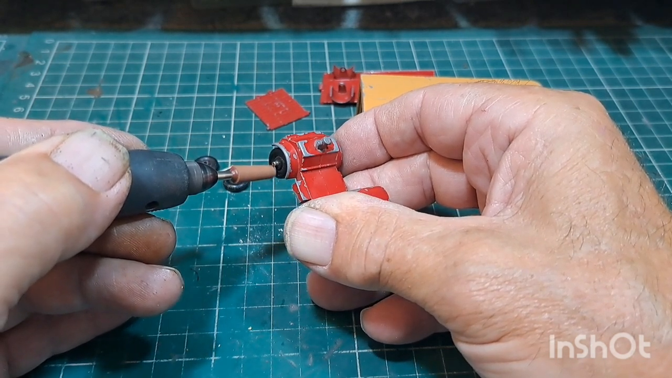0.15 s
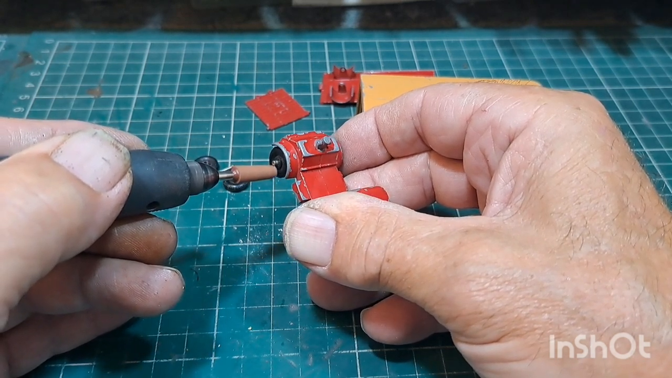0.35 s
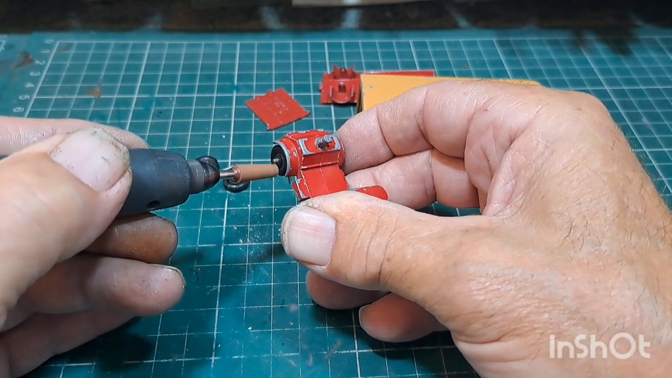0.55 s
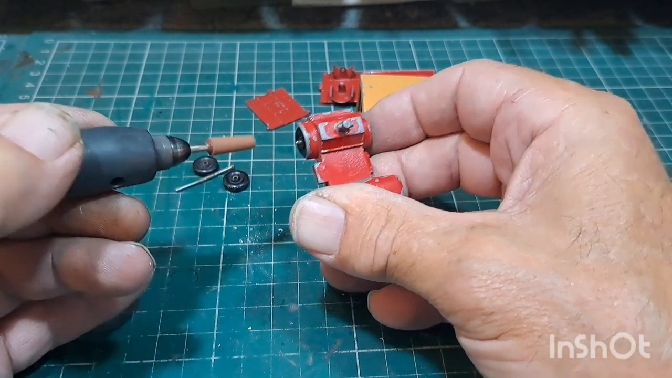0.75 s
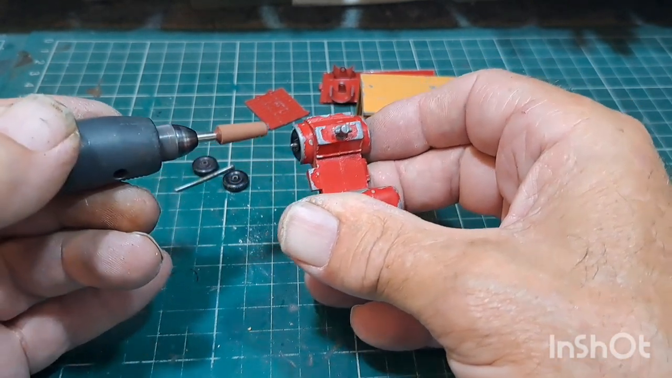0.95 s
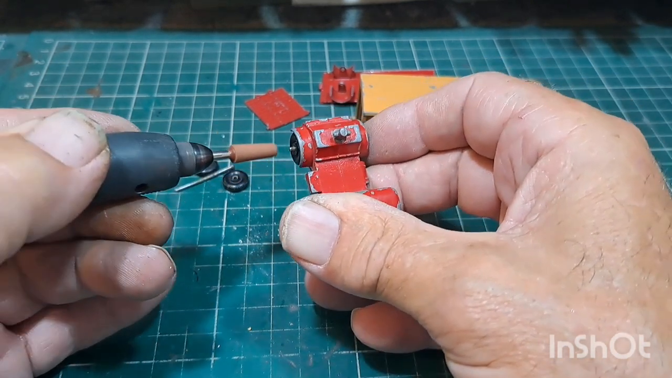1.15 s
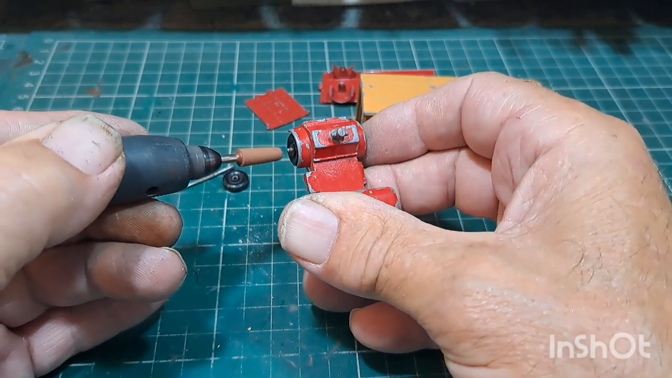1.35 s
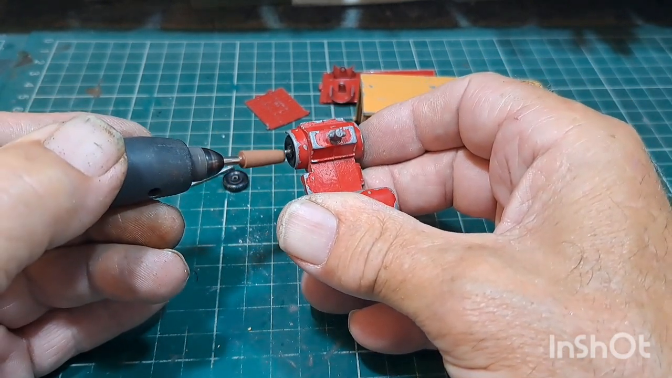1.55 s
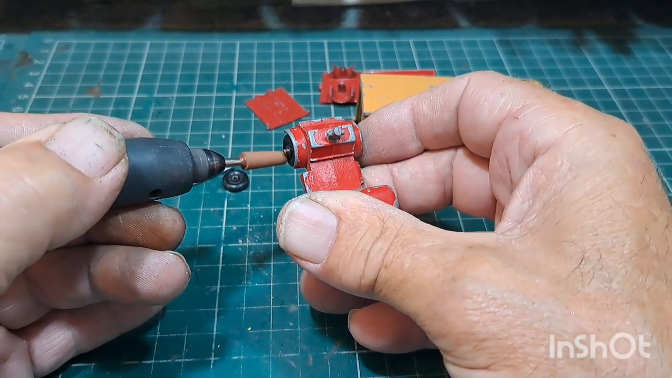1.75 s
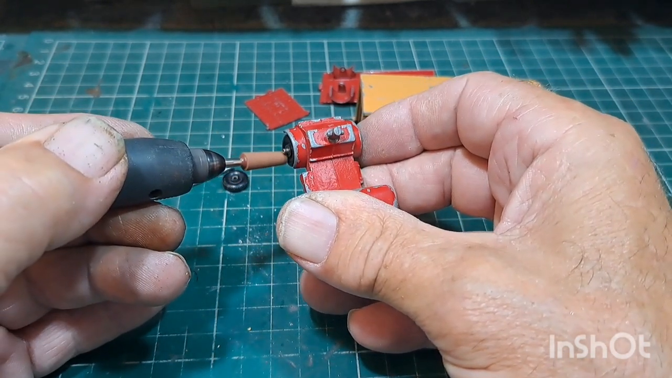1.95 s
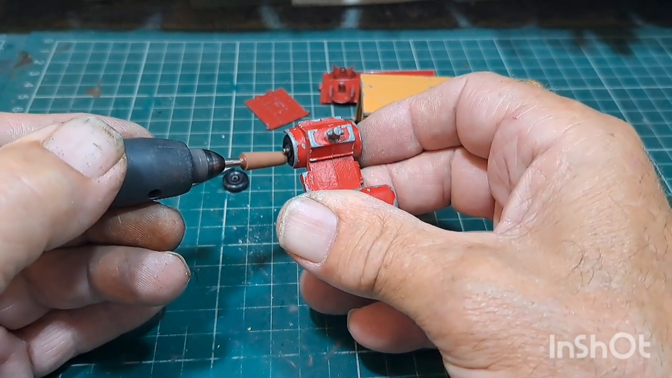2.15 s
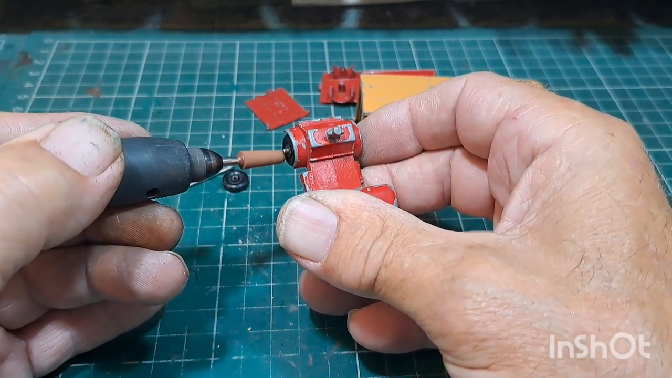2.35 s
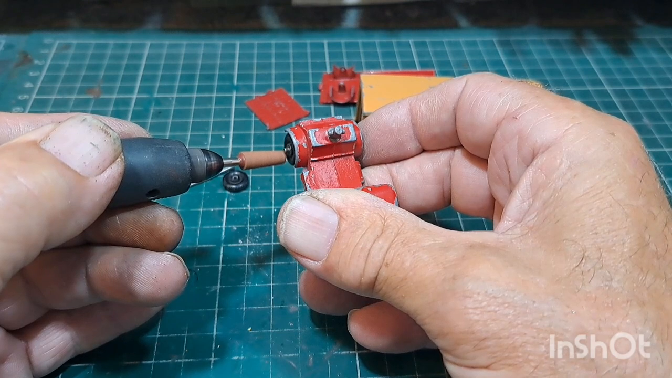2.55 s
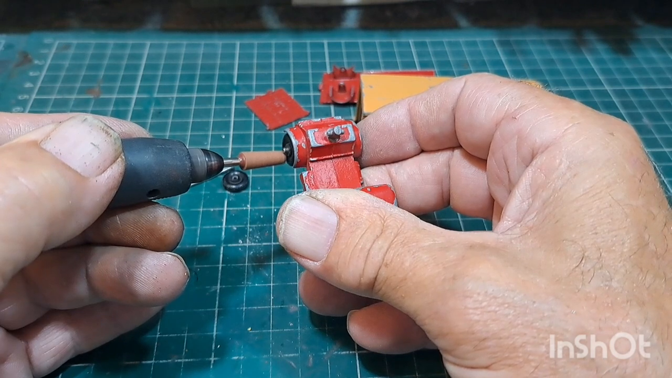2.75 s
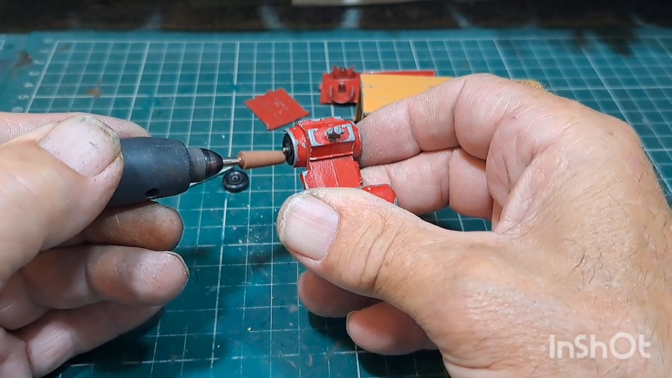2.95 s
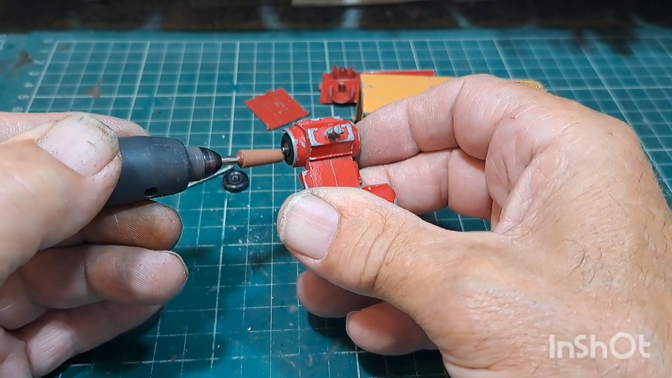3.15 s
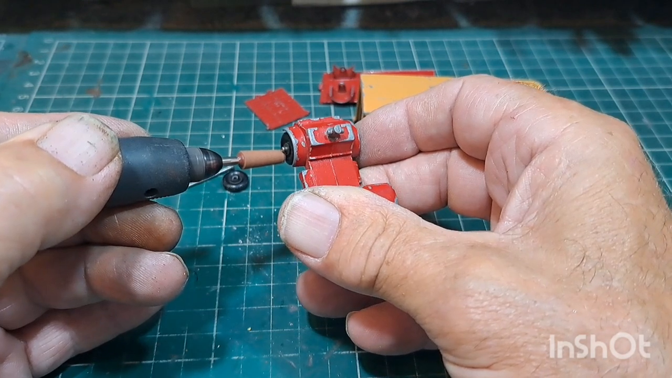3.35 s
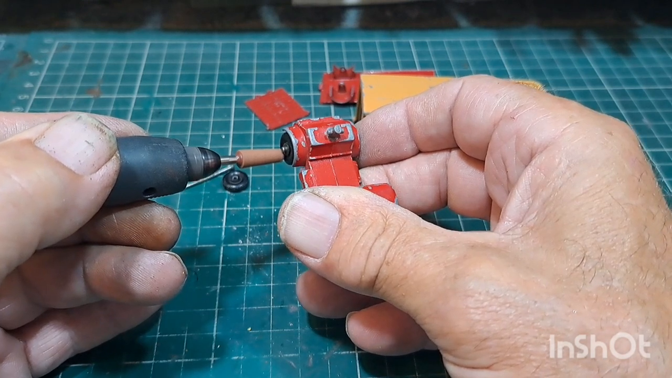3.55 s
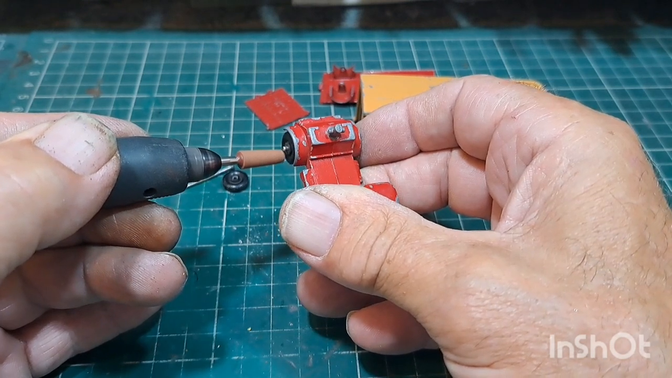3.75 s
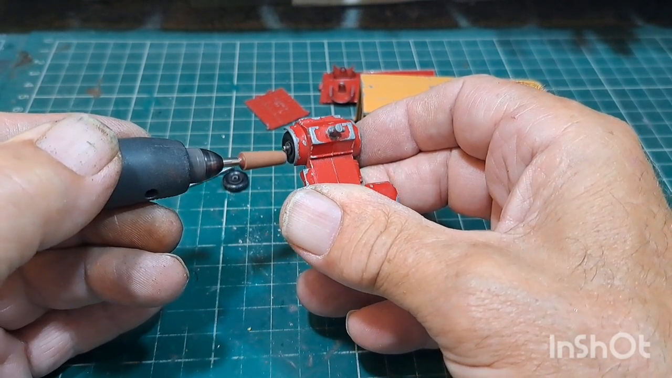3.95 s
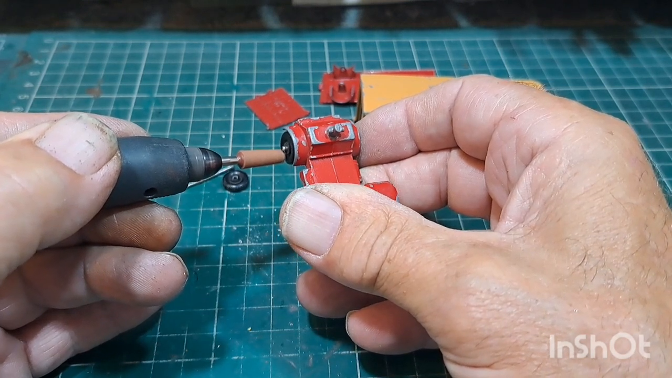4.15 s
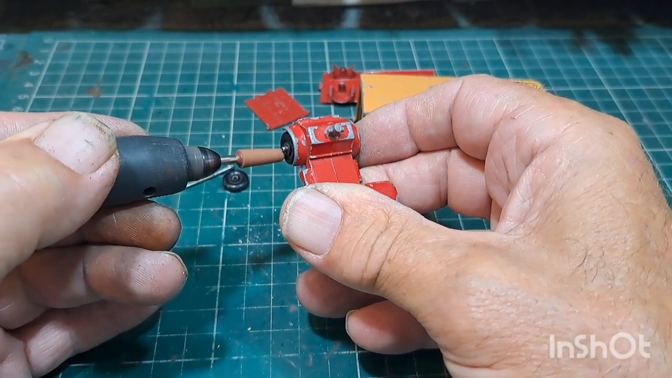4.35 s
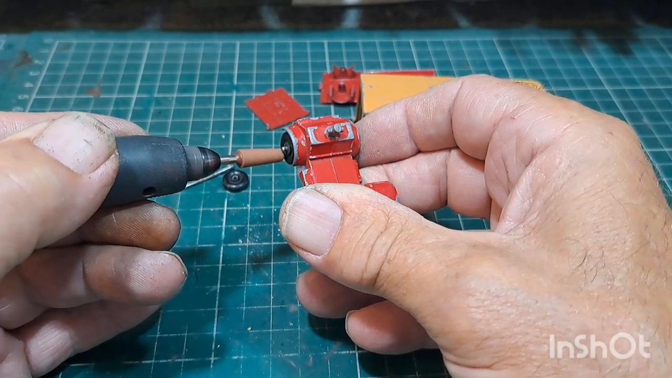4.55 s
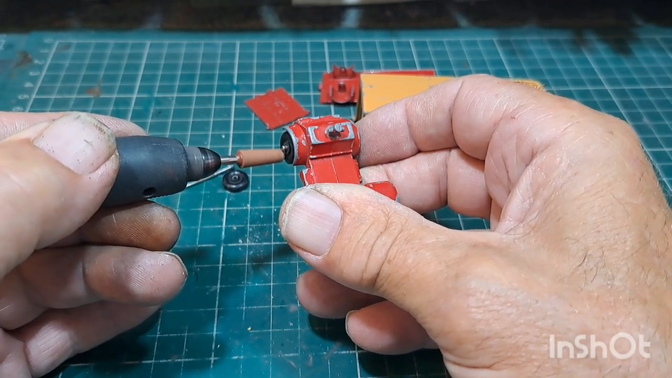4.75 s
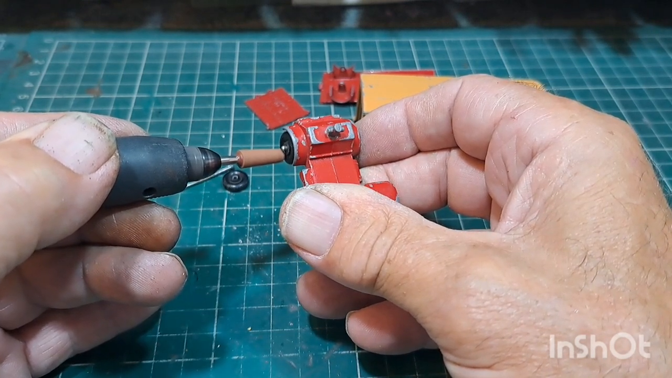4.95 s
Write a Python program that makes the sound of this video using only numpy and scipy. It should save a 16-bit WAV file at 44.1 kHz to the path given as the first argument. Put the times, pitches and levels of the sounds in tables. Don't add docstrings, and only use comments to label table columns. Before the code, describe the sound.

A small rotary tool works very close to a stereo phone microphone in a quiet room. From 0 to 0.6 s its stone grinds the metal axle of a hand-held toy car: a harsh, gritty buzz fluttering about 180 times a second, with bright metallic ringing and hissy treble. It lifts off, and until about 1.6 s only the far quieter motor remains: low steady hum, thin bearing whine, dry brush rattle, a soft knock near 0.9 s and small ticks, clearest near 1.1 s. The stone touches again at 1.6 s, breaks off briefly around 1.8 s, then presses harder through 2 to 3.9 s, with sharp irregular bites and slight changes in strength. Around 4 to 4.2 s it eases and skips in short gaps, then grinds firmly to the end, with an especially hard catch near 4.7 s. Faint room noise and a distant low drone lie underneath; reflections are short.

```python
import sys
import numpy as np
from scipy import signal
from scipy.fft import rfft, irfft, next_fast_len
from scipy.io import wavfile
from scipy.ndimage import uniform_filter1d

SR = 44100
rng = np.random.default_rng(int(sys.argv[2]) if len(sys.argv) > 2 else 0)


def gain_from_db(level_db):
    decades = np.asarray(level_db, float) / 20
    return 10 ** decades


def wav_record(signal):
    frames = np.transpose(np.atleast_2d(signal))
    bounded = np.clip(frames, -1, 1)
    quanta = np.round(bounded * 32767).astype(np.int16)
    wavfile.write(sys.argv[1], SR, quanta)


N = 220617
T = np.arange(N) / SR
M = 2 * next_fast_len(N // 2 + 1)
HZ = np.fft.rfftfreq(M, 1 / SR)
PORT_LAG = 14
SINE = np.sqrt(2)

# time in seconds, speed in turns per second.
SHAFT = [(0, 182.4), (.5, 182.96), (1, 183.22), (1.5, 183.4), (2, 183.01), (2.4, 182.45), (2.8, 182.8),
         (3.25, 182.39), (3.7, 181.09), (4.05, 182.58), (4.35, 181.99), (4.6, 181.52), (5, 181.19)]


def curve(table, at=T):
    s, *columns = np.transpose(table)
    return [np.interp(at, s, c) for c in columns]


def unit(x):
    return x / np.sqrt(np.mean(x ** 2))


def walk(rate_hz):
    k = int(SR / rate_hz)
    held = np.repeat(rng.standard_normal(N // k + 1), k)
    return 1.85 * uniform_filter1d(uniform_filter1d(held, k), k)[:N]


def swells(table, floor_db):
    return gain_from_db(floor_db) + sum(gain_from_db(db) * np.exp(-((T - s) / half_s) ** 2) for s, half_s, db in table)


def panned(x, left_minus_right_db):
    half_db = np.ones(N) * left_minus_right_db / 2
    return x * gain_from_db(np.array([half_db, -half_db]))


def ports(shared, grain_db=0., lag=PORT_LAG):
    grain = gain_from_db(grain_db * np.minimum(rng.exponential(size=N), 4.5))
    common, left, right = rng.standard_normal((3, N)) * grain
    together = np.array([common, np.roll(common, lag)])
    return unit(np.sqrt(shared) * together + np.sqrt(1 - shared) * np.array([left, right]))


def body(modes):
    hz, width_hz, *port_db = np.array(modes, float).T[..., None]
    peak = 1 / (1 + ((HZ ** 2 - hz ** 2) / (HZ * width_hz + 1e-9)) ** 2) ** 1.419
    power = np.array([np.sum(gain_from_db(2 * db) * peak, axis=0) for db in port_db]) + 1e-12
    cepstrum = irfft(np.log(power / power.mean()) / 2, M)
    cepstrum[:, 1:M // 2] *= 2
    cepstrum[:, M // 2 + 1:] = 0
    return np.exp(rfft(cepstrum))


def ring(x, modes):
    return irfft(rfft(x, M) * body(modes))[:, :N]


def bursts(times_s, db, rise_s, fall_s):
    spikes = np.bincount(np.clip((times_s * SR).astype(int), 0, N - 1), gain_from_db(db), N)
    t = T[:SR // 20]
    shape = (1 - np.exp(-(t / rise_s) ** 2)) * np.exp(-t / fall_s)
    return signal.fftconvolve(spikes, shape / np.sqrt(np.sum(shape ** 2) * SHAFT[0][1] / SR))[:N]


def room():
    # frequency in Hz, density in dB.
    noise_colour = [(20, -14.5), (35, -19), (60, -3), (130, -3.5), (230, -5.5), (320, -5), (620, -7.5),
                    (1500, -31), (16000, -54.5)]
    # middle in seconds, half length in seconds, level in dB.
    drone = [
        (1.06, .17, -61),
        (2.07, 0.11, -58),
    ]
    # start in seconds, frequency in Hz, 60 dB decay in seconds, level in dB.
    knocks = [
        (.917, 380, .04, -37),
        (.917, 690, .05, -39),
        (3.778, 440, .04, -32),
    ]
    colour_hz, colour_db = np.transpose(noise_colour)
    colour = gain_from_db(np.interp(np.log(HZ + 1), np.log(colour_hz), colour_db))
    hiss = unit(irfft(rfft(ports(0.46), M) * colour)[:, :N])
    air = gain_from_db(-57 + 1.9 * walk(2.05)) * hiss
    low = gain_from_db(-61 + 1.5 * walk(5)) * SINE * np.sin(2 * np.pi * 99.96 * T + .5 * walk(7))
    low = low + swells(drone, -69.5) * SINE * np.sin(2 * np.pi * 57 * T + 0.55 * walk(4.1))
    for s, hz, t60_s, db in knocks:
        t = np.maximum(T - s, 0)
        low = low + gain_from_db(db) * np.sin(2 * np.pi * hz * t) * (1 - np.exp(-t / 0.003)) * 1000. ** (-t / t60_s)
    return air + panned(low, -2.1)


def shaft_hum(turns, hum_db):
    # middle in seconds, half length in seconds, level in dB.
    tilts = [(.57, .06, -60), (.95, 0.16, -61), (1.55, .2, -59.5), (2.35, 0.15, -60.5), (2.6, 0.15, -66),
             (3.06, 0.09, -62), (3.57, 0.15, -54), (3.79, .04, -57), (4.35, 0.13, -64), (4.8, 0.42, -57.5)]
    loose_db = hum_db.max() - hum_db
    pan_db = -5 + .5 * np.minimum(2 - loose_db, 0)
    once = gain_from_db(hum_db + 0.18 * loose_db * walk(9.6)) * SINE * np.sin(2 * np.pi * turns)
    twice = swells(tilts, -69) * SINE * np.sin(4 * np.pi * turns + 1.2 * walk(20))
    return panned(once, pan_db) + panned(twice, -6.0)


def bearing_whine(turns, hum_db):
    # multiple of shaft rate, level in dB, left minus right in dB.
    tones = [(2.17, -71, -2), (2.69, -71, 0), (3, -73, 0), (4.612, -60, 2), (5, -65, 0), (5.612, -58, -3),
             (6, -65, -3), (6.612, -59, -4), (9.224, -65, -4), (10.224, -54, -5), (11.224, -58, -4),
             (11.82, -62, -3), (15.83, -66, -2), (17.83, -68, 0)]
    out = 0
    for order, db, side_db in tones:
        level = gain_from_db(db + .7 * (hum_db + 46) + 2.2 * walk(16))
        tone = SINE * np.sin(2 * np.pi * order * turns + .6 * walk(10) + order)
        out = out + panned(level * tone, side_db)
    return out


def brush_rattle(turns):
    # frequency in Hz, width in Hz, left port in dB, right port in dB.
    housing = [(973, 300, -7.5, -10), (1577, 650, 0, 3.5), (2074, 510, 0.5, 2.5), (3100, 810, -4.5, -3.5),
               (4100, 970, -9, -1.5), (4820, 490, 2.5, -2.5), (5600, 730, -2, -4.5),
               (7920, 1900, -10.5, -5.5), (9500, 3300, -13, -31.5), (11940, 1630, -3.5, 0.5),
               (13800, 2450, -13.5, -18), (15300, 4300, -10, -8)]
    # time in seconds, level over the rattle in dB.
    ticks = [
        (.73, -8),
        (.82, -11),
        (1.01, -2),
        (1.084, 7),
        (1.215, -3),
        (1.322, 1),
    ]
    timing, strength = rng.standard_normal((2, int(turns[-1])))
    times_s = np.interp(np.arange(len(timing)) - .25 + 0.16 * timing, turns, T)
    play = 1.43 + bursts(times_s, -8 + 3.3 * np.minimum(strength, 1.6), 0.00061, 0.0016)
    play = play + bursts(*np.transpose(ticks), .001, 0.0044)
    return gain_from_db(-41) * ring(play * ports(0.3, grain_db=4.0), housing)


def motor(turns):
    # time in seconds, shaft hum level in dB.
    grip = [(0.0, -46), (0.08, -47), (1.21, -47), (2.28, -44), (2.42, -48), (3.01, -46), (3.66, -51.5),
            (3.72, -57), (3.88, -54.5), (4.82, -51.5), (4.86, -47), (4.9, -58), (5.0, -50)]
    hum_db = curve(grip)[0]
    return shaft_hum(turns, hum_db) + bearing_whine(turns, hum_db) + brush_rattle(turns)


def stone_bites(turns, press_db, touching, bounce_db):
    # time in seconds, place in turns.
    high_spot = [(0, -.3), (2.75, -.25), (3.5, -.06), (5, -.09)]
    # time in seconds, peak in dB.
    hard_bites = [(0.1246, -5.5), (0.3433, -8.5), (0.381, -10), (0.4689, -4), (0.5239, -6.5), (1.5886, -11),
                  (1.8464, -12.5), (1.9158, -9.5), (1.9484, -12), (1.9925, -7.5), (2.1731, -5),
                  (2.1837, -5), (2.43, -6), (2.496, -7.5), (2.5676, -5), (2.6209, -9.5), (2.6439, -9),
                  (2.6985, -4), (2.7975, -1.5), (2.89, -8), (3.705, -5.5), (3.8686, -8.5), (3.9845, -9.5),
                  (4.0112, -12.5), (4.0613, -12), (4.1277, -4.5), (4.1712, -12.5), (4.1929, -11.5),
                  (4.7147, -4), (4.7593, -5)]
    count = np.arange(1, int(turns[-1]))
    times_s = np.interp(count, turns - curve(high_spot)[0], T)
    timing, strength = rng.standard_normal((2, len(count)))
    hard_s, peak_db = np.transpose(hard_bites)
    hard = np.abs(times_s[:, None] - hard_s + .0005).argmin(axis=0)
    since_hard = count - np.maximum.accumulate(np.isin(count - 1, hard) * count)
    times_s = times_s + .00025 * timing
    times_s[hard] = hard_s - .0008
    at = (times_s * SR).astype(int).clip(0, N - 1)
    uneven = np.minimum(strength - 0.42 * np.roll(strength, shift=1), 1.4)
    alternate = (-1.) ** since_hard - .4
    bite_db = press_db[at] - 6 + 3.72 * uneven + bounce_db[at] * alternate
    bite_db[~touching[at]] = -120
    bite_db[hard - 1] += -7
    bite_db[hard] = peak_db - 19.5
    crack = bursts(hard_s, bite_db[hard] - 10, 0.00034, 0.00048)
    return times_s, at, bite_db, crack


def grinding(turns):
    # time in seconds, pressure as scrape level in dB.
    contact_spans = [
        [(0.0, -32.5), (0.04, -27.5), (0.46, -26.5), (0.47, -35), (0.476, -25), (0.57, -26.5), (0.6, -32),
         (0.63, -58)],
        [(1.586, -32.5), (1.656, -22.5), (1.758, -26), (1.78, -33), (1.79, -50), (1.8, -38)],
        [(1.8, -41), (1.856, -32.5), (1.864, -44.5), (1.92, -24), (1.926, -32.5), (2.094, -21.5), (2.1, -27.5),
         (2.436, -21), (2.45, -32)],
        [(2.45, -29), (2.554, -25), (2.566, -23), (2.618, -24), (2.852, -23.5), (2.87, -32)],
        [(2.87, -29), (2.896, -25), (3.244, -22.5), (3.362, -23), (3.41, -29), (3.42, -24)],
        [(3.42, -25), (3.434, -26.5), (3.622, -21), (3.928, -28.5), (3.95, -32), (4.016, -38), (4.02, -40)],
        [(4.055, -44), (4.061, -29), (4.141, -24), (4.15, -41)],
        [(4.165, -37), (4.171, -22), (4.187, -48), (4.191, -30.5), (4.269, -21.5), (4.271, -27), (4.55, -24)],
        [(4.55, -25.5), (4.578, -23), (4.708, -24.5), (4.716, -14.5), (4.748, -26.5), (4.82, -21), (5.0, -23.5)],
    ]
    # start in seconds, end in seconds, depth in dB.
    bounces = [(0.247, 0.402, 4.5), (1.855, 2.024, 0.5), (2.126, 2.193, 3), (2.44, 2.533, 3),
               (2.596, 2.87, 4), (3.835, 4.023, 3), (4.053, 4.142, 8), (4.16, 4.294, 1.5),
               (4.505, 4.808, 2.5)]
    # frequency in Hz, width in Hz, left port in dB, right port in dB.
    chassis = [(1060, 194, 3, -14), (1301.5, 500, -3, -6)]
    shell = [(1660, 490, -23, 3.5), (2020, 380, 0, 3.5), (2192, 160, 0, 7), (2770, 850, -2, 1.5)]
    axle = [(3430, 610, -12, -4), (3717, 140, 1.5, -16), (3850, 144, -7, 1.5), (4130, 210, 2.5, -19),
            (4525, 430, -24, 4), (5060, 490, -3.5, -12)]
    stone = [(6483, 660, -19, -4.5), (7130, 2200, -4.5, -8.5), (7900, 840, -21, -3.5),
             (8760, 820, -11.5, -14.5), (9810, 1430, -10, -8.5), (10760, 1200, -7.5, -9),
             (11200, 840, -4, -2.5), (12190, 860, 0, 4.5), (13000, 600, -6, -6), (14360, 1140, -6, 0),
             (15000, 1000, -3, -14.5)]
    hub = [(5516, 560, 0.95, -2)]
    hands = [(111.9, 124, -9, -5), (316, 56, -6, -1), (770, 49, -25, -8.5)]
    touching = np.any([(T >= part[0][0]) & (T <= part[-1][0]) for part in contact_spans], axis=0)
    press_db = curve(np.vstack(contact_spans))[0]
    bounce_db = sum(db * ((T > start) & (T < end)) for start, end, db in bounces)
    bounce_db = uniform_filter1d(bounce_db, size=900)
    times_s, at, bite_db, crack = stone_bites(turns, press_db, touching, bounce_db)
    contact = gain_from_db(press_db - 6.5) * uniform_filter1d(1. * touching, size=200)
    rub = contact * gain_from_db(-7.5 - 1.2 * bounce_db + 1.44 * walk(70))
    lean_db = -0.46 * np.clip(press_db + 22.5, -8, 8)
    shell_db = -6.5 + lean_db
    stone_db = 3 + 0.2 * lean_db
    hub_db = -6.5 + .5 * lean_db + 4 * np.exp(-T / 0.34)
    # modes, part dB, rub dB, share common to the ports, bite fall in s, port lag in samples
    parts = ((axle, 0 * T, -4, .55, .0012, PORT_LAG),
             (shell, shell_db, .4, .8, .0012, PORT_LAG),
             (hub, hub_db, -.6, .4, .0012, PORT_LAG),
             (stone, stone_db, .2, .35, .0015, PORT_LAG),
             (chassis, shell_db - 15, -10.5, .95, .002, PORT_LAG // 2))
    rumble = uniform_filter1d(contact, size=3000) * gain_from_db(-26.5 + 2.3 * walk(6.05))
    out = ring(rumble * ports(0.92), hands)
    for modes, part_db, rub_db, shared, fall_s, lag in parts:
        catch_db = 1.87 * rng.standard_normal(len(times_s))
        push = bursts(times_s, bite_db + part_db[at] + catch_db, 0.0017, fall_s)
        push = push + (rub * gain_from_db(rub_db) + crack) * gain_from_db(part_db)
        out = out + ring(push * ports(shared, grain_db=0.37, lag=lag), modes)
    return out


def drift(x, depth_db, rate_hz):
    notch = 1 - .65 * np.exp(-((HZ - 3470) / 43) ** 2)
    x = irfft(rfft(x, M) * notch)[:, :N]
    spectrum = rfft(x, M)
    for hz in 2000 * 2 ** np.arange(0, 3.1, .5):
        share = np.cos(np.pi * np.clip(np.log2(HZ / hz + 1e-9), -.5, .5)) ** 2
        x = x + (gain_from_db(depth_db * walk(rate_hz)) - 1) * irfft(spectrum * share)[:, :N]
    return x


def reflections(near):
    t = T[:SR // 4]
    tail = rng.standard_normal((2, len(t))) * 1000. ** (-t / 0.043) * (t > .0015)
    tail = unit(tail) / np.sqrt(len(t))
    treble = signal.sosfilt(signal.butter(2, 1400, "high", fs=SR, output="sos"), near)
    return gain_from_db(-9.5) * signal.fftconvolve(treble, tail, axes=1)[:, :N]


def scene():
    turns = np.cumsum(curve(SHAFT)[0]) / SR
    near = drift(grinding(turns) + motor(turns), depth_db=0.52, rate_hz=6.03)
    return near + reflections(near) + room()


def roll_off(x):
    return signal.sosfilt(signal.butter(12, 16750, fs=SR, output="sos"), x)


def record(dry):
    low_pass = 1 / (1 + np.exp(np.clip((HZ - 15780) / 25, -40, 40)))
    cut = irfft(rfft(dry, M) * low_pass)[:, :N]
    return roll_off(np.clip(cut, -1, 1))


dry = scene()
out = record(dry)
wav_record(out)
```